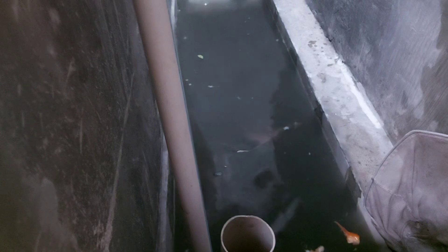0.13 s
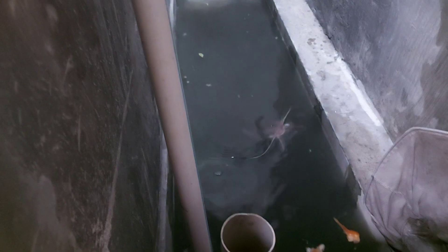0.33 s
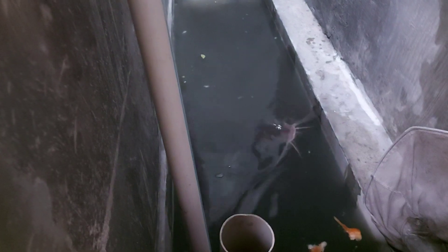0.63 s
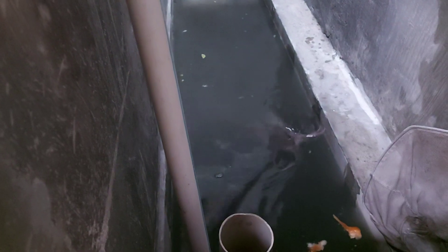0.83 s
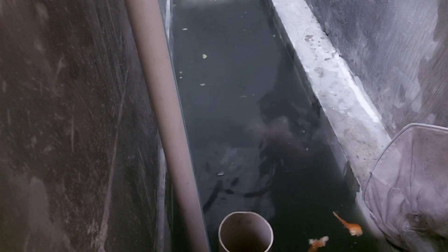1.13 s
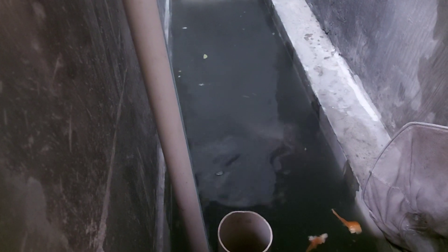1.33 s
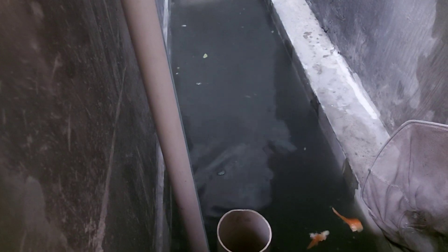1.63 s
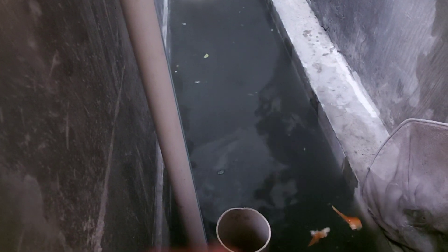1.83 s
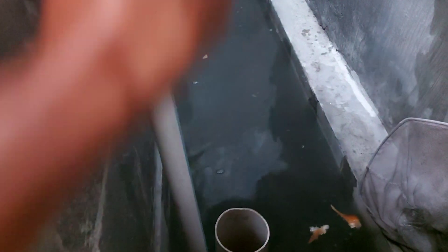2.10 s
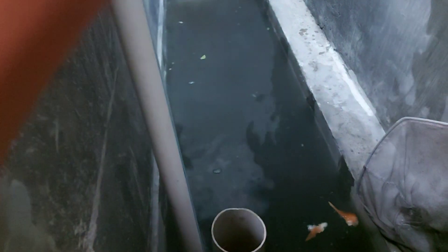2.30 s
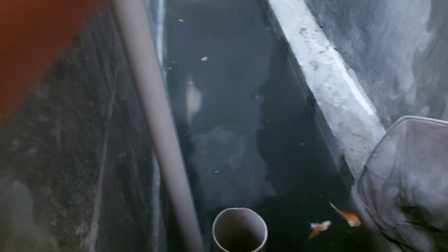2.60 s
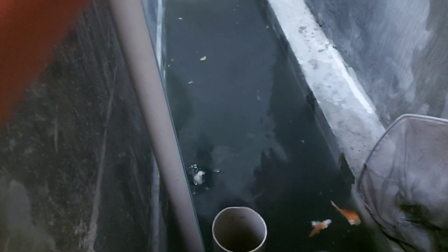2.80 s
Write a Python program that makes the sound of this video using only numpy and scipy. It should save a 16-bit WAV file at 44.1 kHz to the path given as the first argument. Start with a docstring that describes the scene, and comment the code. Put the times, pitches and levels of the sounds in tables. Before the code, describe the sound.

Sharp watery snaps and fine droplet spray from feeding fish, clustered early then scattered and weaker, with a short hard-walled ring, over soft low booming and thin outdoor hiss, heard by a phone above the tank.

```python
"""A narrow concrete tank outdoors: fish snap at food on the surface, a metre below a phone held over the edge.
Each splash is a crack of random-signed noise and a thinning spray of random drops, some ringing briefly.
Decaying noise stands for the ring of the hard walls; sine bubbles and bands of fine spatter join the splashes.
A low rumble booms in the tank's resonances, made of flickering noise bands, over an outdoor hiss."""
import sys
import numpy as np
from scipy import signal
from scipy.fft import rfft, irfft
from scipy.io import wavfile
from scipy.ndimage import uniform_filter1d

SR = 44100
rng = np.random.default_rng(int(sys.argv[2]) if len(sys.argv) > 2 else 0)


def pcm_store(signal):
    """Save signal as 16-bit PCM."""
    levels = np.round(np.clip(np.atleast_2d(signal), -1, 1) * 32767)
    wavfile.write(sys.argv[1], SR, levels.astype(np.int16).T)


N = 130095
FREQS = np.fft.rfftfreq(N, 1 / SR) + 1e-3  # Hz, kept off zero for the logarithms


def undb(db):
    """Turn decibels into an amplitude factor."""
    return 10 ** (np.asarray(db) / 20)


def along_hz(table, hz):
    """Read a table of f/Hz and value on a log-frequency axis."""
    table = np.maximum(np.array(table, float), [1, -np.inf])
    return np.interp(np.log(hz), np.log(table[:, 0]), table[:, 1])


def walk(rate):
    """Random levels held 1 / rate seconds and smoothed twice into slow slopes; spread near 1."""
    k = int(SR / rate)
    steps = np.repeat(rng.standard_normal(N // k + 1), k)
    return np.sqrt(2) * uniform_filter1d(uniform_filter1d(steps, k), k)[:N]


def noise(gain):
    """Stereo noise of the given spectrum, from mid and side parts; rms 1 when averaged to mono."""
    # How alike the two microphone ports hear it: f/Hz, likeness [-1..1]
    likeness = [(25, 0.69), (60, 1), (130, 0.99), (290, .75), (640, 0.2), (1400, -0.072), (3100, -0.022)]
    like = np.clip(along_hz(likeness, FREQS), -1, 1)
    mid, side = rfft(rng.standard_normal((2, N))) * gain * np.sqrt([1 + like, 1 - like])
    x = irfft(np.array([mid + side, mid - side]), N)
    return x / np.sqrt(np.mean(x.mean(axis=0) ** 2))


def narrow(hz, width):
    """Noise in one resonance, falling away on both sides of its centre."""
    return noise(1 / (1 + (2 * (FREQS - hz) / width) ** 2))


def bed(table, db):
    """A noise bed on a level curve; its half-octave bands flicker independently."""
    flicker_db, flicker_per_s = 1.5, 7.66
    inside = (FREQS > table[0][0]) & (FREQS < table[-1][0])
    whole = rfft(noise(undb(along_hz(table, FREQS)) * inside))
    first, last = np.floor(2 * np.log2(table[0][0])), 2 * np.log2(table[-1][0])
    out = 0
    for centre in np.arange(first, last + 1):  # in half octaves
        share = np.clip(1 - abs(2 * np.log2(FREQS) - centre), 0, 1)
        out = out + irfft(whole * share, N) * undb(flicker_db * walk(flicker_per_s))
    return out * undb(db)


def hiss():
    """The outdoor hiss: a broad noise bed and a treble one, each on its own level curve."""
    # Hiss levels: t/s, hiss level/dB, treble hiss level/dB
    levels = np.array([(0.0, -61, -69), (0.09, -60.5, -62), (0.2, -71.5, -80), (0.35, -65.5, -75),
                       (1.05, -70.5, -76), (1.33, -68, -73.5), (1.44, -63, -74), (1.58, -67.5, -75.5),
                       (1.79, -67.5, -76.5), (2.0, -66, -72.5), (2.25, -70, -78), (2.62, -68.5, -75),
                       (2.81, -70, -76.5), (2.95, -65.5, -73)])
    # Spectrum of the hiss: f/Hz, level/dB per Hz
    hiss_colour = [(530, -5), (900, -7), (1090, -21), (1610, -13.5), (1730, -1.5), (1900, -3.5), (2080, -4),
                   (2230, -4.5), (2510, -8), (2940, -8.5), (3180, -2), (4810, -7.5), (7350, -4),
                   (9500, -14.5), (12400, -25), (16000, -58)]
    # Spectrum of the treble hiss: f/Hz, level/dB per Hz
    treble_colour = [(5290, -6), (9000, -35), (9350, -4), (11700, 4), (13600, 1), (16000, -8.5)]
    at_s, hiss_db, treble_db = levels.T
    t = np.arange(N) / SR
    return bed(hiss_colour, np.interp(t, at_s, hiss_db)) + bed(treble_colour, np.interp(t, at_s, treble_db))


def rumble():
    """The low boom and upper rumble on level curves, over a bed of the lowest lows at one level."""
    # Rumble levels: t/s, boom level/dB, upper rumble level/dB
    levels = np.array([(0.0, -48, -55), (0.27, -50, -54.5), (0.42, -43, -59.5), (0.54, -61, -57),
                       (0.61, -46.5, -63), (0.66, -49, -53.5), (0.9, -52, -57.5), (0.93, -41.5, -57),
                       (1.09, -48.5, -60.5), (1.19, -48, -56), (1.82, -46.5, -59.5), (1.97, -52, -54.5),
                       (2.18, -41, -57), (2.21, -48.5, -62.5), (2.69, -45.5, -59), (2.83, -56, -60),
                       (2.88, -44, -57.5), (2.95, -53, -56.5)])
    # Spectrum of the boom: f/Hz, level/dB per Hz
    boom_colour = [(35, -58), (60, -19), (91, -3), (108, 5.5), (120, 0), (161, -14), (194, -25),
                   (220, -26.5), (290, -51)]
    # Spectrum of the upper rumble: f/Hz, level/dB per Hz
    upper_colour = [(94, -13), (160, -3), (193, -5.5), (231, -8), (302, -1.5), (551, -20), (743, -23.5),
                    (1010, -30), (1950, -32)]
    # Spectrum of the lowest lows: f/Hz, level/dB per Hz
    sub_colour = [(15, -22), (27, -13), (40, 0), (52, -7), (70, -4)]
    at_s, boom_db, upper_db = levels.T
    t = np.arange(N) / SR
    out = bed(sub_colour, -66)  # dB
    out = out + bed(boom_colour, np.interp(t, at_s, boom_db))
    return out + bed(upper_colour, np.interp(t, at_s, upper_db))


def resonances():
    """Narrow resonances that waver in level, and swells of noise, narrow or broad, brief or longer."""
    # Lasting resonances: f/Hz, width/Hz, level/dB rms before wavering
    rings = [(188, 13, -66), (298, 8.9, -68), (346.7, 12.6, -72), (1758, 18, -84.5), (2132, 107, -76)]
    # Swells: t/s at the middle, length/s, f/Hz, width/Hz, level/dB rms at the height
    swells = [(0.535, 0.18, 298, 8.7, -53), (0.594, 0.63, 1100, 800, -78), (0.933, 0.26, 310, 12, -57),
              (1.229, 0.077, 101, 19, -38.5), (1.765, .12, 655, 13, -75.5), (1.928, 0.13, 1100, 34, -68.5),
              (2.164, 0.12, 2170, 220, -67), (2.67, 0.12, 40, 15, -52), (2.693, 0.5, 188, 3.6, -58)]
    waver_db, waver_per_s = 4.5, 5.6
    t, out = np.arange(N) / SR, 0
    for hz, width, db in rings:
        out = out + undb(db + waver_db * walk(waver_per_s)) * narrow(hz, width)
    for s, length, hz, width, db in swells:
        swell = np.cos(np.pi * np.clip((t - s) / length, -.5, .5)) ** 2
        out = out + undb(db) * narrow(hz, width) * swell
    return out


def bubble(t, hz, db, t60, glide):
    """A bubble rings as a decaying sine whose pitch glides up."""
    rise_s = 0.0015
    ring = np.sin(2 * np.pi * hz * t * (1 + glide * t / t60 / 2))
    return ring * (1 - np.exp(-t / rise_s)) * undb(db - 60 * t / t60)


def spatter(t, hz, width, db, t60):
    """Fine drops merge into a band of noise that dies away."""
    fizz = noise(np.exp(-2 * ((FREQS - hz) / width) ** 2))[:, :len(t)]
    return fizz * undb(db - 60 * t / t60)


def plinks(t):
    """Some drops trap air: short rings, each at its own pitch and place between the ports."""
    per_s, low_hz, octaves = 300, 1843, 2.2
    cycles, level_db = 6, -5  # cycles to fall 20 dB; level against the drops before fading
    gap, pitch, side = rng.random((128, 3)).T
    start = np.cumsum(-np.log(gap)) / per_s
    hz, age = low_hz * 2 ** (octaves * pitch), t[:512, None]
    rings = np.sin(2 * np.pi * hz * age) * undb(-20 * age * hz / cycles)
    # Late starts land past the end and are cut off
    place = np.minimum(start * SR, len(t)).astype(int) + np.arange(len(age))[:, None]
    out = np.zeros((2, 2 * len(t)))
    for port, share in zip(out, (side, 1 - side)):
        np.add.at(port, place, rings * np.sqrt(share))
    expected_rms = np.sqrt(np.mean(rings ** 2) * len(age) * per_s / SR / 2)
    return undb(level_db) * out[:, :len(t)] / expected_rms


def spray(t, t60):
    """Patchy droplets of random size, scattered left and right, with ringing plinks; all fade together."""
    drops_per_s, scatter_db, biggest = 3680, 4.5, 2.2  # biggest caps the random size
    patch_db, patch_s, rise_s = 4, 0.0024, 0.0027
    n = len(t)
    luck, size = rng.random((2, n)), rng.exponential(size=(2, n))
    hits = np.clip(drops_per_s - luck * SR, 0, 1000)  # zero where no drop falls
    drops = hits * undb(scatter_db * np.minimum(size, biggest)) * rng.standard_normal((2, n))
    patch = uniform_filter1d(rng.standard_normal(n), size=int(patch_s * SR))
    patchy = undb(patch_db * patch / patch.std()) * drops / drops.std()
    fade = undb(-60 * t / max(t60, .01)) * (1 - np.exp(-t / rise_s))
    return fade * (patchy + plinks(t))


def crack(t, hz, crack_db):
    """Spectrum of the water's crack: a slap and a random-signed burst, reaching the left port first."""
    t60_s, rise_s, port_lag_s = 0.0091, 0.0001, 0.00019
    slap_db = 9  # the first instant, over the burst
    burst = (1 - np.exp(-t / rise_s)) * undb(crack_db - 60 * t / t60_s)
    signs = np.sign(rng.standard_normal(len(t)))
    lag = np.exp(-2j * np.pi * hz * np.array([[0], [port_lag_s]]))
    return (rfft(signs * burst) + undb(crack_db + slap_db)) * lag


def splash(t, db, lows_db, low_middle_db, highs_db, t60, crack_db):
    """Crack and spray share one minimum-phase colour, tilted anew for each splash."""
    # Common colour of the splashes: f/Hz, level/dB per Hz
    base_colour = [(290, -24), (500, -20), (819, -16.5), (1250, -11.5), (1770, -13.5), (2190, -7.5),
                   (2360, -10), (4150, -1), (5240, -5.5), (7210, -3), (9360, -11), (11800, -5.5),
                   (16000, -17)]
    trim_db = -16.5  # common to all splashes
    n = len(t)
    hz = FREQS[0] + np.fft.rfftfreq(n, 1 / SR)
    tilt = [(1100, lows_db), (2280, low_middle_db), (5240, 0), (13000, highs_db)]  # f/Hz, level/dB
    colour_db = along_hz(base_colour, hz) + along_hz(tilt, hz)
    low_cut = np.clip(hz / base_colour[0][0], 0, 1) ** 2
    # Folding the cepstrum forward in time gives the filter a sharp start
    cepstrum = irfft(np.log(undb(colour_db) * low_cut), n)
    fold = np.where(t < t[n // 2], 2, 0) / np.where(t == 0, 2, 1)
    shape = np.exp(rfft(cepstrum * fold))
    shape = shape / np.sqrt(np.mean(abs(shape) ** 2))
    both = crack(t, hz, crack_db) + rfft(spray(t, t60))
    return undb(db + trim_db) * irfft(both * shape, n)


def water():
    """All bubbles, spatters and splashes at the surface, before the walls answer."""
    # Bubbles: t/s, f/Hz, level/dB, t60/s, rise of pitch over the t60 [share]
    bubble_rows = [(0.0725, 2160, -40, 0.016, 0.03), (0.2, 1810, -46.5, 0.088, 0.02),
                   (0.24, 2190, -47, 0.027, 0.024), (1.3035, 3460, -42, 0.011, 0.11),
                   (1.9905, 2100, -34, 0.0091, 0.067), (2.763, 3970, -48.5, 0.028, .06)]
    # Spatters of small drops: t/s, centre f/Hz, width/Hz, level/dB rms at the start, t60/s
    spatter_rows = [(0.1952, 6900, 1730, -32, 0.014), (0.2055, 11900, 2000, -50, 0.017),
                    (.69, 14400, 3000, -65, 0.082), (1.2155, 13900, 2200, -54.5, 0.045),
                    (1.413, 11900, 6000, -55.5, 0.023), (1.888, 11500, 2480, -64, 0.11),
                    (1.926, 6600, 1990, -60.5, 0.052), (2.017, 7800, 1500, -65.5, 0.056),
                    (2.024, 14600, 3030, -61, 0.08), (2.8386, 7100, 3040, -45, 0.048),
                    (2.84, 5030, 900, -54.5, 0.15)]
    # Splashes: t/s, level/dB before the common trim, lows/dB, low-middle/dB, highs/dB,
    # spray t60/s (at least 0.01), crack level over spray/dB
    splash_rows = [(0.0092, -36.5, 4, 16, 4.5, 0.26, 14), (0.0335, -34.5, 15.5, 8, -1, 0.2, 2),
                   (0.046, -41.5, 22, 22, -2, 0.33, 1), (0.0632, -29, 14, 6.5, -1, 0.12, 13.5),
                   (0.0755, -37, -4, 1, 3, 0.054, 17.5), (0.171, -41.5, 8, 9, -2, 0.12, 10),
                   (0.1905, -36, -11, -6, -6, 0.079, 3), (0.1955, -21, -2.5, 0.5, 2, 0.1, 13),
                   (0.2046, -41.5, 3, 6, -3, 0.06, 15), (0.215, -35, -3, 9, -10, 0.16, 9),
                   (0.2389, -31, 7, 9, -10, 0.12, 14), (0.403, -41, 15, 5, -6, 0.079, 11.5),
                   (0.6188, -48, 22, 7.5, 14, 0.4, 8), (0.7771, -42.5, 8.5, 15, -5, 0.091, 10),
                   (0.7944, -43.5, -4, 13, 0, 0.094, 1), (1.1148, -45, -20, -7, 7, 0.26, 9),
                   (1.2587, -40, 2, 11, 8, 0.11, 12.5), (1.304, -43, 11, 14, 6.5, 0.056, 13),
                   (1.4127, -44.5, 13, 14, 2, 0.12, 13), (1.4292, -52, 27, 16, 7, 0.69, 10),
                   (1.991, -40.5, 5, 13.5, 3, 0.12, 14.5), (2.0491, -48, 10, 18, -6, 0.24, 4),
                   (2.836, -30, 4.5, -2, 9, 0.13, 3)]
    out, t = np.zeros((2, N + SR)), np.arange(SR // 2) / SR
    for source, rows in (bubble, bubble_rows), (spatter, spatter_rows), (splash, splash_rows):
        for s, *row in rows:
            start = int(s * SR)
            out[:, start:start + len(t)] += source(t, *row)
    return out[:, :N]


def walls(dry):
    """The hard walls return the water as a short decaying noise tail, different at each port."""
    t60_s, level_db = 0.21, -2
    t = np.arange(SR // 2) / SR
    tail = rng.standard_normal((2, len(t))) * undb(-60 * t / t60_s)
    tail = tail / np.sqrt(np.sum(tail ** 2, axis=1, keepdims=True))
    return undb(level_db) * signal.fftconvolve(dry, tail, axes=1)[:, :N]


def scene():
    """Hiss, rumble, resonances and swells lie behind the water, heard direct and then from the walls."""
    background = hiss() + rumble() + resonances()
    direct = water()
    return background + direct + walls(direct)


def record(dry):
    """The phone's two microphone ports differ in colour; a steep low-pass cuts the top."""
    # Balance of the ports: f/Hz, left minus right level/dB
    balance = [(60, 0), (150, -1.4), (350, 2.5), (700, 5), (1400, 4), (2800, -1.4), (5600, -6),
               (8500, -9.5), (11000, 4.5), (15000, -6)]
    top_hz = 15900
    half_db = along_hz(balance, FREQS) / 2
    ports = irfft(rfft(dry) * undb([half_db, -half_db]), N)
    return signal.sosfilt(signal.ellip(10, .2, 60, top_hz, fs=SR, output="sos"), ports)


dry = scene()
out = record(dry)
pcm_store(out)
```